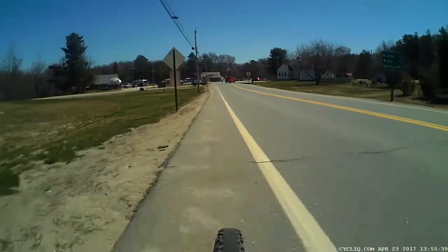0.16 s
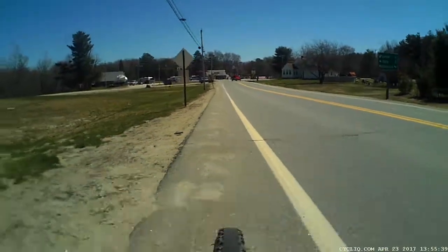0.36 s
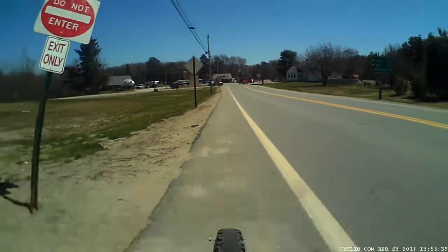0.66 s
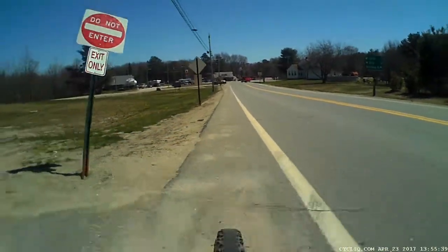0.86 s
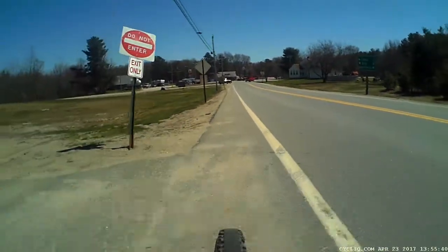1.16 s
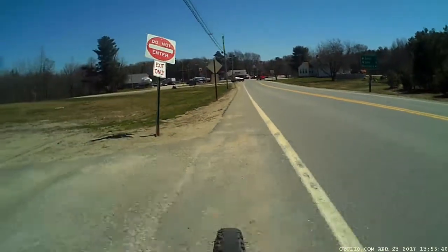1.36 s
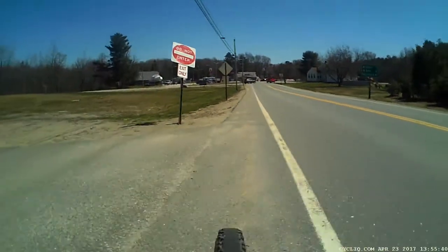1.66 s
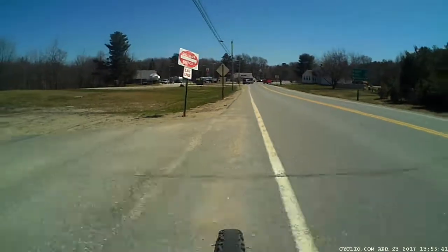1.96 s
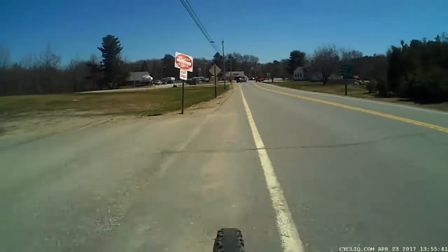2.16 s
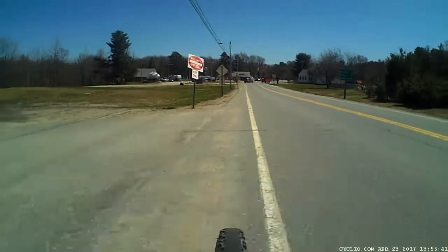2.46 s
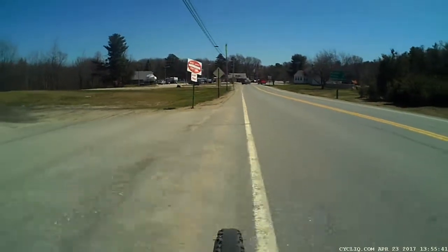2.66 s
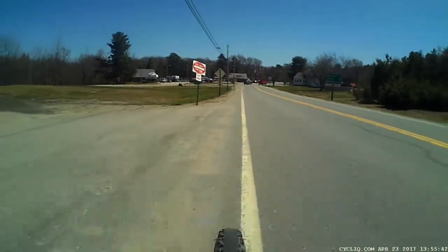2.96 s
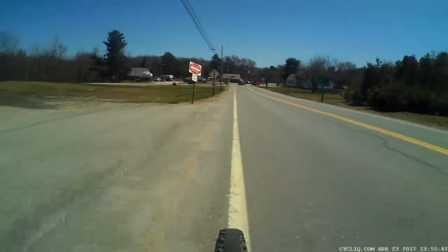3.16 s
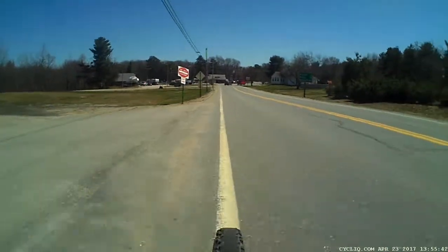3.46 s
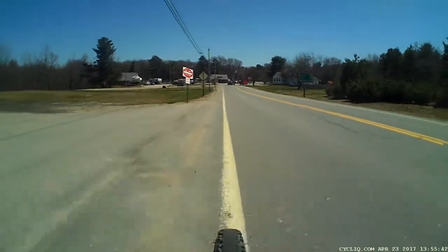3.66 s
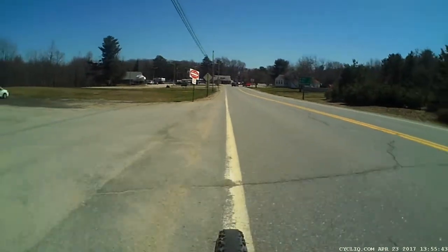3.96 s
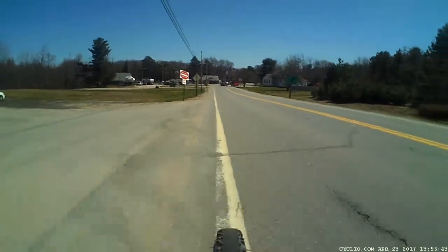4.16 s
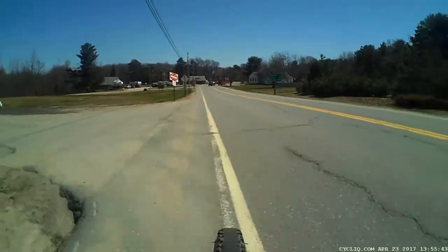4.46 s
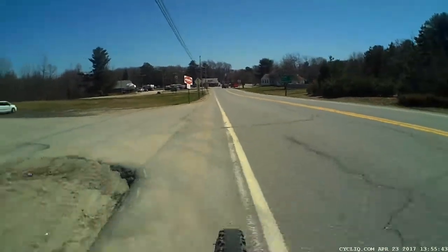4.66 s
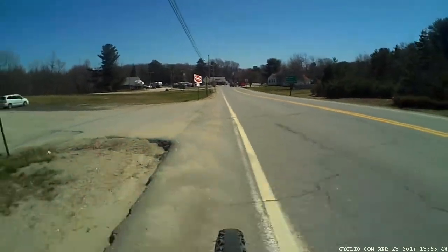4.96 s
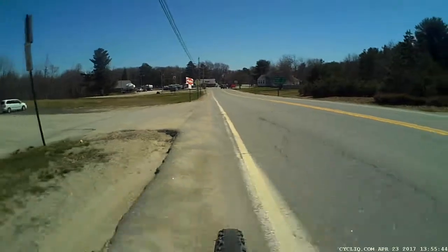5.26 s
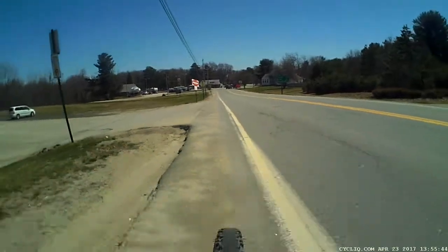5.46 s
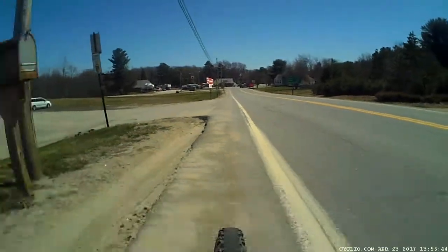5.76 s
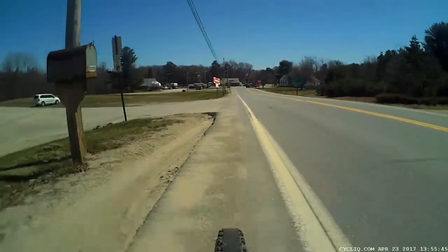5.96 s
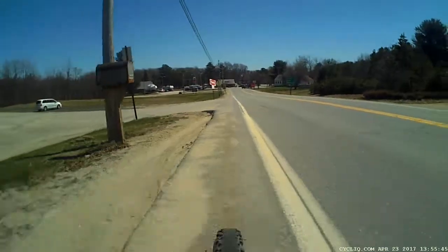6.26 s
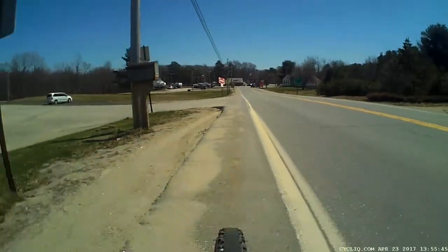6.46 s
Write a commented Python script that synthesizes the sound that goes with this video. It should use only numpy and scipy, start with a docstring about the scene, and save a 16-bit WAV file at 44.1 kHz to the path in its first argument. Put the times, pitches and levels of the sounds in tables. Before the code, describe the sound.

The microphone rides on a bicycle moving along the sandy edge of a paved road. Low, lumpy wind rumble, a hollow tyre drone of roughly 80 to 500 Hz, fine tread noise and faint hiss run throughout. From 0 to 1.9 seconds, bright sand crunches in patches; stones snap sharply near 0.1 and 0.8, with smaller clicks to 1.8. Gusts flap around 0.7 to 0.8, and a strong flutter and thump hit near 1.5. From 2 to 4 the surface is mostly smooth with sparse grit; a gust flutters at 2.1, low thumps land at 2.7 to 2.9, and the drone dips near 3.15 before recovering. The wind lulls around 4.6. Sand returns from 4.7, with stones near 5.0, 5.6 and 5.9. From 5.5 the gusts build, with a heavy thump at 6.0 and dense, tearing flutter until the abrupt end around 6.6.

```python
"""A camera rides on a bicycle along the sandy shoulder of a paved road.
Throughout: wind rumble from drifting eddies, tyre drone through the frame's modes, tread noise and hiss.
Early: crunching sand, snapping stones, and gusts that flutter, flap and thump at the microphone.
Middle: the sand thins to grit, the drone dips and recovers, then the wind lulls.
Late: sand and stones return and the gusts tear into their densest flutter."""
import sys
import numpy as np
from scipy import signal
from scipy.fft import rfft, irfft
from scipy.io import wavfile
from scipy.ndimage import uniform_filter1d

SR = 44100
rng = np.random.default_rng(int(sys.argv[2]) if len(sys.argv) > 2 else 0)


def to_wav(s):
    """Save 16-bit WAV."""
    ch = np.atleast_2d(s).T  # columns
    pcm = np.round(np.clip(ch, -1, 1) * 32767)  # PCM
    wavfile.write(sys.argv[1], SR, pcm.astype(np.int16))


N = 291972
TIME = np.arange(N) / SR

# Tables. Levels are relative: the sources trim them. Spectra are scaled to rms 1 before use.
# air speed over the microphone, as rumble level: (time [s], level [dB])
WIND_CURVE = [(0.0, -31.5), (0.7, -27.5), (0.83, -23), (1.36, -27), (1.47, -18.5), (1.68, -29.5),
              (2.1, -23), (2.6, -28), (2.9, -24), (3.06, -28), (3.42, -27), (3.9, -28), (4.62, -38.5),
              (4.78, -32), (5.1, -32.5), (5.75, -20), (6.2, -22.5), (6.5, -16.5)]
# large lumps of pressure: (frequency [Hz], density [dB per Hz])
RUMBLE_SPECTRUM = [(10, -8), (25, 4), (45, -3), (80, -2.5), (120, -13), (180, -17.5), (300, -28),
                   (600, -39.5), (1500, -89)]
# smaller, faster eddies: (frequency [Hz], density [dB per Hz])
CHURN_SPECTRUM = [(40, -29), (100, -5), (140, 2.5), (175, 1.5), (240, -14.5), (600, -53.5), (1500, -100)]
# gusts that break up at the microphone port: (start [s], end [s], level [dB])
GUST_EVENTS = [(0.65, 0.67, -39), (0.815, 0.86, -42.5), (1.448, 1.52, -40), (2.085, 2.22, -40.5),
               (2.78, 2.86, -44.5), (3.49, 3.54, -42), (5.49, 5.6, -39.5), (5.68, 5.86, -36.5),
               (6.04, 6.13, -39), (6.235, 6.33, -36.5), (6.42, 6.55, -35.5)]
# dull buffeting of a mild gust: (frequency [Hz], density [dB per Hz])
BUFFET_SPECTRUM = [(50, -19), (150, 4), (280, -1.5), (500, -16), (800, -13), (1300, -24.5), (2200, -41),
                   (5000, -71)]
# air torn at the port: (frequency [Hz], density [dB per Hz])
FLUTTER_SPECTRUM = [(40, -8.5), (150, -7.5), (350, 3), (650, -3), (1000, -8.5), (1600, -18.5), (2200, -22),
                    (3200, -32), (5000, -74), (9000, -82)]
# coarseness of the road, which shakes the frame: (time [s], level [dB])
ROAD_CURVE = [(0, -36.5), (.8, -33.5), (2.85, -34.5), (3.15, -44.5), (3.6, -37.5), (4.1, -39), (4.4, -33.5),
              (5.1, -35.5), (6.62, -38)]
# frame and camera mount: (frequency [Hz], nominal width [Hz], level before width weighting [dB])
FRAME_MODES = [(84.8, 20.1, 5), (222.5, 18, -4), (284.5, 38.8, 0.5), (344.4, 78, -5.5), (424, 20.6, -5.5),
               (483.4, 45, -12), (642, 84, -21.5), (755.4, 74, -19), (920, 105, -23.5), (1272, 30, -25.5)]
# tread on the road: (frequency [Hz], density [dB per Hz])
TREAD_SPECTRUM = [(100, -23.5), (400, 6), (570, -6), (700, -15.5), (1000, -1), (1500, -4.5), (1800, -6),
                  (2100, -4), (2700, -12.5), (3400, -14), (4000, -11), (4500, -13), (5200, -29),
                  (6200, -32), (9000, -32)]
# patches of sand under the tyre: (start [s], end [s], level [dB])
SAND_PATCHES = [(0.03, 1.86, -66), (0.265, 0.29, -56), (0.42, 0.5, -59), (0.93, 1.31, -60),
                (0.53, 0.87, -54.5), (1.35, 1.59, -57), (1.58, 1.804, -55.5), (4.7, 6.2, -66.5),
                (4.86, 4.85, -59), (5.135, 5.23, -60), (5.28, 5.4, -62), (5.44, 5.54, -55.5),
                (5.685, 5.8, -59), (5.89, 5.96, -53.5), (6.13, 6.38, -63.5)]
# crushed sand and grit: (frequency [Hz], density [dB per Hz])
CRUNCH_SPECTRUM = [(500, -27), (1200, -6), (2000, -5.5), (2800, -6.5), (3500, -2), (4100, 4.5), (4900, -1),
                   (5700, -9.5), (7000, -19.5), (8000, -23), (9500, -20.5), (11000, -32), (15000, -61)]
# microphone hiss: (frequency [Hz], density [dB per Hz])
HISS_SPECTRUM = [(100, 9), (14000, -4), (16000, -15)]
# stones flicked by the tyre, counted from 0.99 ms: (time [s], peak [dB], ring pitch [Hz])
STONE_ROWS = [(0.0783, -11.5, 4230), (0.1237, -35, 3820), (0.5975, -32, 3870), (0.6963, -22.5, 4140),
              (0.726, -23, 4480), (0.7905, -12, 4440), (1.136, -22, 4900), (1.436, -25.5, 4300),
              (1.708, -19, 4370), (1.7835, -19.5, 5000), (4.9532, -24.5, 4500), (5.5877, -23.5, 4480),
              (5.931, -18, 4130), (5.9444, -22.5, 4100), (5.954, -24, 3880), (6.084, -27.5, 4200),
              (6.134, -31, 4230), (6.5186, -28.5, 4600)]
# the same stones: (start [s], peak [dB], ring pitch [Hz])
STONE_EVENTS = [(time_s + 0.00099, peak_db, hz) for time_s, peak_db, hz in STONE_ROWS]
# hardest flaps of air across the port: (time [s], peak [dB])
FLAP_EVENTS = [(0.658, -27), (0.827, -28.5), (1.449, -22.5), (1.468, -27), (1.501, -31.5), (2.103, -31),
               (2.194, -35), (2.791, -31), (5.608, -27), (5.681, -24.5), (5.765, -28), (5.806, -27),
               (5.837, -21.5), (5.85, -23), (5.865, -22), (6.009, -26), (6.05, -22), (6.111, -21.5),
               (6.222, -22.5), (6.253, -21), (6.266, -22), (6.281, -19.5), (6.302, -39), (6.327, -23.5),
               (6.403, -22.5), (6.429, -20.5), (6.458, -20.5), (6.514, -20.5), (6.548, -21.5)]
# ripping edge of a hard flap: (frequency [Hz], density [dB per Hz])
RIP_SPECTRUM = [(200, -9), (800, 2.5), (1500, -3), (2300, -11.5), (3200, -13), (4200, -28), (6000, -44),
                (9000, -50)]
# large eddies at the microphone: (time [s], peak [dB], half length [s], wake level [dB])
THUMP_EVENTS = [(0.827, -35, 0.0043, -30.5), (1.47, -11.5, 0.0073, -32), (2.701, -14, 0.0018, -26),
                (2.801, -12, 0.0047, -29), (2.931, -12, 0.0029, -57), (3.495, -19, 0.00073, -30.5),
                (6.01, -3, 0.004, -31.5), (6.492, -26, 0.011, -34)]
# single grains snapping: (time [s], peak [dB])
GRAIN_EVENTS = [(1.6102, -37), (1.8931, -41), (2.4523, -47), (3.096, -44), (3.5932, -47), (3.7574, -48),
                (4.8744, -40), (5.9416, -35)]

CHURN_DB, CHURN_GROWTH_DB_PER_DB = -31.5, 1.72  # level in the strongest wind; growth per dB of wind
GUST_RISE_S, GUST_FALL_S = 0.014, 0.02
BREEZE_DB = -29  # flutter bed between gusts, relative to WIND_CURVE, before trims
TREAD_DB, HISS_DB = -51, -71
SAND_RISE_S, SAND_FALL_S = 0.0067, 0.0067
DUST_DB = -72.5  # grit on bare asphalt, before the sand trim
FLAP_S = 0.012  # fall of the force to 1/e
GRIT_EDGE_HZ, BAND_EDGE_HZ = 10000, 15620
FADE_S = 0.004


def gain_of(db):
    """Decibels to amplitude."""
    return 10 ** (np.asarray(db) / 20)


def evened(x):
    """Scales to rms 1."""
    return x / np.sqrt(np.mean(x ** 2) + 1e-20)


def level(curve):
    """Level curve to per-sample gain, linear in dB between points."""
    return gain_of(np.interp(TIME, *np.transpose(curve)))


def add(mix, start_s, sound):
    """Mixes a sound in at start_s."""
    part = mix[max(round(start_s * SR), 0):][:len(sound)]
    part += sound[:len(part)]


def coloured(x, spectrum):
    """Shapes x with a causal minimum-phase filter, so that clicks stay sharp; rms 1."""
    hz, db = np.transpose(spectrum)
    bin_hz = abs(np.fft.fftfreq(16384, 1 / SR))
    bin_db = np.interp(np.log(bin_hz + 1), np.log(hz + 1), db)
    log_gain = np.log(gain_of(bin_db))
    taps = np.fft.ifft(np.exp(np.conj(signal.hilbert(log_gain)))).real
    return evened(signal.oaconvolve(x, taps[:len(taps) // 2])[:N])


def wander(rate_hz):
    """Random drift with a Gaussian roll-off at rate_hz; rms 1."""
    hz = np.fft.rfftfreq(N, 1 / SR)
    drift = rfft(rng.standard_normal(N)) * np.exp(-(hz / rate_hz) ** 2)
    return evened(irfft(drift, N))


def steadied(x, span_s):
    """Divides out slow swells, leaving the fast texture."""
    size = max(int(span_s * SR), 1)
    power = uniform_filter1d(uniform_filter1d(x ** 2, size), size)
    return x / np.sqrt(abs(power) + 1e-12)


def grains(per_s, spread_db):
    """Random impulses of either sign: many small, a few large."""
    size = gain_of(spread_db * np.minimum(rng.exponential(1, N), 5))
    return size * rng.choice([-1, 1], N) * (rng.random(N) < per_s / SR)


def swells(events, rise_s, fall_s, bed):
    """Gain of events that rise, hold and decay, summed in power over a bed."""
    power = bed ** 2
    for start_s, end_s, db in events:
        attack = np.clip((TIME - start_s) / rise_s, 0, 1)
        release = np.exp(-np.maximum(TIME - end_s, 0) / fall_s)
        power = power + (gain_of(db) * attack * release) ** 2
    return np.sqrt(power)


def rumble(trim_db, lump_db, lump_hz):
    """Eddies drift over the microphone as low lumps of pressure that swell and sag."""
    lumps = steadied(coloured(rng.standard_normal(N), RUMBLE_SPECTRUM), span_s=0.029)
    swell = gain_of(trim_db + lump_db * np.tanh(wander(lump_hz)))
    return swell * level(WIND_CURVE) * lumps


def churn():
    """Faster air sheds smaller eddies, so the rumble reaches higher as the wind picks up."""
    wind = level(WIND_CURVE)
    eddies = steadied(coloured(rng.standard_normal(N), CHURN_SPECTRUM), span_s=0.042)
    return gain_of(CHURN_DB) * (wind / wind.max()) ** CHURN_GROWTH_DB_PER_DB * eddies


def flutter(dull_db, torn_db, tear_growth, burst_db, burst_hz):
    """A mild gust buffets dully; a strong one tears off the port in bright, short bursts."""
    breeze = gain_of(BREEZE_DB) * level(WIND_CURVE)
    gust = swells(GUST_EVENTS, GUST_RISE_S, GUST_FALL_S, breeze)
    bursts = gain_of(burst_db * np.tanh(wander(burst_hz)))
    dull = coloured(steadied(bursts * rng.standard_normal(N), span_s=0.012), BUFFET_SPECTRUM)
    torn_air = steadied(bursts * grains(per_s=5000, spread_db=6.5), span_s=0.068)
    torn = coloured(torn_air, FLUTTER_SPECTRUM)
    tear = (gust / gust.max()) ** tear_growth
    return gust * (gain_of(dull_db) * dull + gain_of(torn_db) * tear * torn)


def tyre(trim_db, waver_db, sway_db, follow_hz):
    """Rough asphalt and tread knobs shake the frame's modes; the tread hisses on the road."""
    coarse = level(ROAD_CURVE)
    drone = np.zeros(N)
    for hz, width_hz, mode_db in FRAME_MODES:
        b, a = signal.iirpeak(hz, hz / (1.34 * width_hz), SR)
        once = signal.lfilter(b, a, rng.standard_normal(N))
        ring = steadied(signal.lfilter(b, a, once), span_s=1.0)
        # modes above follow_hz feel coarseness less; each sways on its own
        follow = evened(coarse) ** min(follow_hz / hz, 1)
        drive = follow * gain_of(sway_db * wander(rate_hz=5.4))
        drone += gain_of(mode_db) * np.sqrt(width_hz) * drive * ring
    waver = gain_of(waver_db * wander(rate_hz=66))
    tread = coloured(rng.standard_normal(N) * waver, TREAD_SPECTRUM)
    return gain_of(trim_db) * coarse.mean() * evened(drone) + gain_of(TREAD_DB) * tread


def tread_ticks(rms_db, ring_hz, width_hz):
    """Rubber knobs peel off the asphalt with faint, irregular ticks that ring the port."""
    b, a = signal.iirpeak(ring_hz, ring_hz / width_hz, SR)  # width of each of two passes
    peels = grains(per_s=70, spread_db=1.5)
    ringing = signal.lfilter(b, a, signal.lfilter(b, a, peels))
    return gain_of(rms_db) * evened(ringing)


def sand(trim_db, clump_db, tint_db, count=6):
    """Fine sand hisses in clumps, coarse grains tick one by one; each layer of the two together has its own
    tint."""
    hz, colour_db = np.transpose(CRUNCH_SPECTRUM)
    clumps = steadied(gain_of(clump_db * wander(rate_hz=45)), span_s=0.08)
    crunch = np.zeros(N)
    for k in range(count):
        tint = tint_db * np.cos(2 * np.pi * (np.log(hz) + k / count))
        fine = clumps * rng.standard_normal(N)
        coarse = 1.3 * evened(grains(per_s=18, spread_db=1.5))
        crunch += coloured(fine + coarse, np.c_[hz, colour_db + tint])
    patches = swells(SAND_PATCHES, SAND_RISE_S, SAND_FALL_S, gain_of(DUST_DB))
    return gain_of(trim_db) * patches * evened(crunch)


def hiss():
    """The microphone's own steady noise."""
    return gain_of(HISS_DB) * coloured(rng.standard_normal(N), HISS_SPECTRUM)


def stones(trim_db, rise_s, ring_t60_s, knock_db, knock_t60_s, rattle_db, rattle_t60_s):
    """A stone snaps out from under the tread: a short ring, a duller knock and a scatter of grit."""
    out, t = np.zeros(N), np.arange(SR // 20) / SR
    grit = coloured(rng.standard_normal(N), CRUNCH_SPECTRUM)
    band = signal.butter(3, [1700, 3600], "bandpass", fs=SR, output="sos")
    rise = 1 - np.exp(-(t / rise_s) ** 2)
    scatters = np.array_split(grit, len(STONE_EVENTS))
    for (start_s, peak_db, hz), scatter in zip(STONE_EVENTS, scatters):
        ring = np.sin(2 * np.pi * hz * t) * gain_of(-60 * t / ring_t60_s) * rise
        blow = rng.standard_normal(len(t)) * gain_of(knock_db - 60 * t / knock_t60_s)
        knock = signal.sosfilt(band, blow)
        rattle = scatter[:len(t)] * gain_of(rattle_db - 60 * t / rattle_t60_s)
        add(out, start_s, gain_of(peak_db + trim_db) * (ring + knock + rattle))
    return out


def flaps(trim_db, rip_db, rip_growth):
    """The flow lets go at once: a ragged, sharp-fronted puff that rips more the harder it is."""
    air = steadied(grains(per_s=4000, spread_db=2), span_s=0.002)
    t = np.arange(SR // 10) / SR
    force = np.zeros(N)
    for start_s, peak_db in FLAP_EVENTS:
        add(force, start_s, gain_of(peak_db) * np.exp(-(t / FLAP_S) ** 2))
    puff = air * force
    rip = puff * (force / force.max()) ** rip_growth
    puff_sound = gain_of(trim_db) * puff.std() * coloured(puff, FLUTTER_SPECTRUM)
    return puff_sound + gain_of(rip_db) * rip.std() * coloured(rip, RIP_SPECTRUM)


def thumps(trim_db, wake_s):
    """A large eddy's core sucks at the port, with a push either side and a short low wake."""
    out = np.zeros(N)
    band = signal.butter(2, [120, 260], "bandpass", fs=SR, output="sos")
    wake = steadied(signal.sosfilt(band, rng.standard_normal(N)), span_s=0.02)
    for centre_s, peak_db, half_s, wake_db in THUMP_EVENTS:
        u = (TIME - centre_s) / half_s
        out += gain_of(peak_db + trim_db) * (u ** 2 - 1) * np.exp(-u ** 2 / 2)
        # the wake is strongest wake_s / 2 after the core
        out += gain_of(wake_db) * wake * np.exp(-((TIME - centre_s) / wake_s - 0.5) ** 2)
    return out


def grain_ticks(trim_db, t60_s):
    """Single hard grains crack with a thin, bright tick."""
    out, t = np.zeros(N), np.arange(SR // 50) / SR
    band = signal.butter(2, [4000, 10500], "bandpass", fs=SR, output="sos")
    for start_s, peak_db in GRAIN_EVENTS:
        crack = signal.sosfilt(band, rng.standard_normal(len(t)) * gain_of(-60 * t / t60_s))
        add(out, start_s, gain_of(peak_db + trim_db) * crack / abs(crack).max())
    return out


def scene():
    """Wind on the microphone, the tyre on the road, and the microphone's own hiss."""
    wind = rumble(trim_db=-2.5, lump_db=4, lump_hz=16.7) + churn()
    wind += flutter(dull_db=4.5, torn_db=1.0, tear_growth=0.32, burst_db=7.5, burst_hz=91)
    wind += flaps(trim_db=-5.5, rip_db=-9.5, rip_growth=1.0)
    wind += thumps(trim_db=-5.0, wake_s=0.02)
    road = tyre(trim_db=0.5, waver_db=1.1, sway_db=1.5, follow_hz=222)
    road += tread_ticks(rms_db=-63.5, ring_hz=4010, width_hz=490)
    grit = sand(trim_db=9.0, clump_db=0.5, tint_db=6.5)
    grit += stones(trim_db=6.0, rise_s=0.00035, ring_t60_s=0.003, knock_db=-16.5,
                   knock_t60_s=0.014, rattle_db=-22.5, rattle_t60_s=0.026)
    grit += grain_ticks(trim_db=-3.0, t60_s=0.012)
    # the sealed port lets little of the top treble through
    port = signal.butter(8, GRIT_EDGE_HZ, fs=SR, output="sos")
    road += signal.sosfilt(port, grit)
    return (wind + road + hiss())[None]


def record(dry):
    """Steep low-pass near 15.6 kHz, with soft ends."""
    ends = np.clip(np.minimum(TIME, TIME[-1] - TIME) / FADE_S, 0, 1)
    taps = signal.firwin(511, BAND_EDGE_HZ, window=("kaiser", 9), fs=SR)
    return signal.oaconvolve(dry * ends, taps[None], "same")


dry = scene()
out = record(dry)
to_wav(out)
```